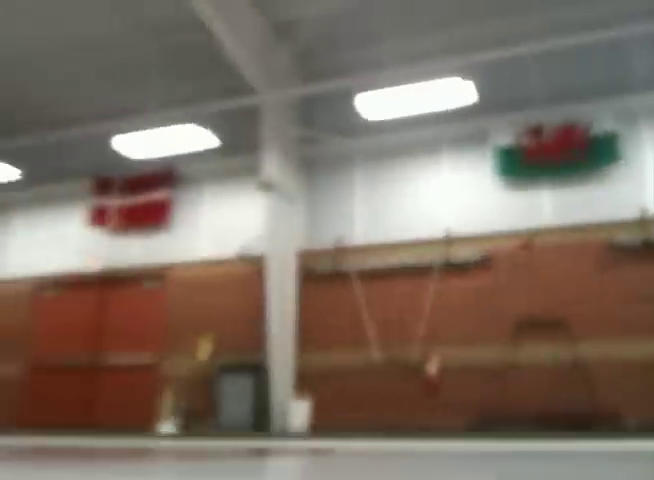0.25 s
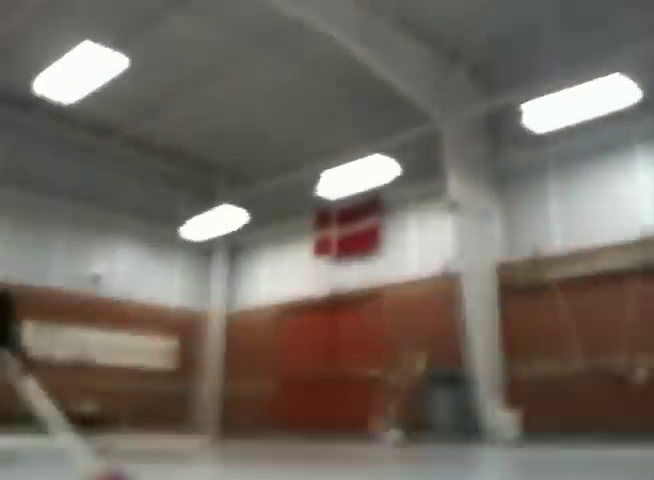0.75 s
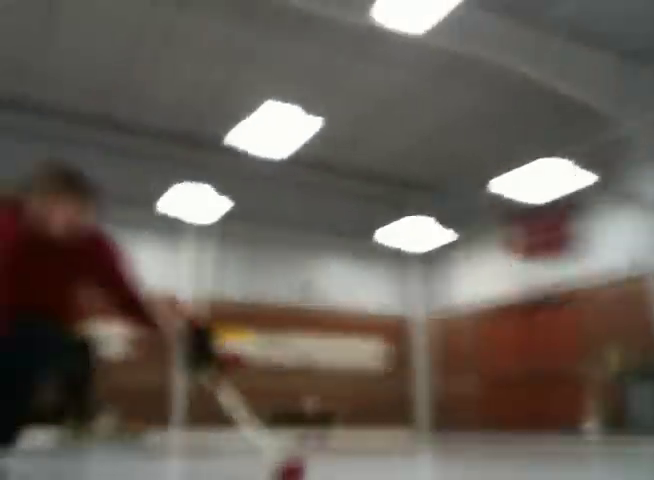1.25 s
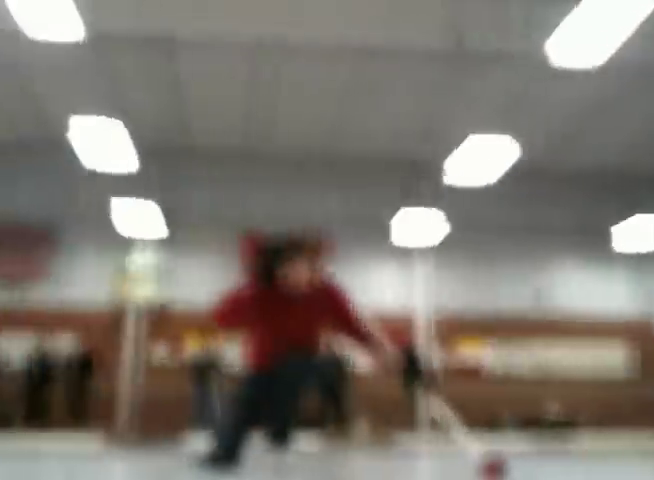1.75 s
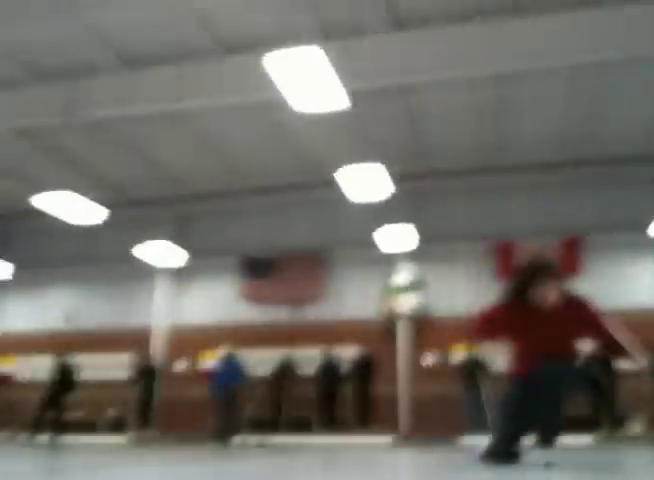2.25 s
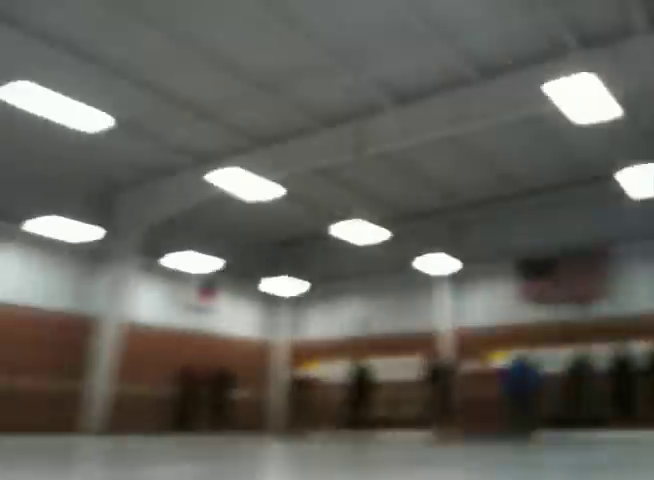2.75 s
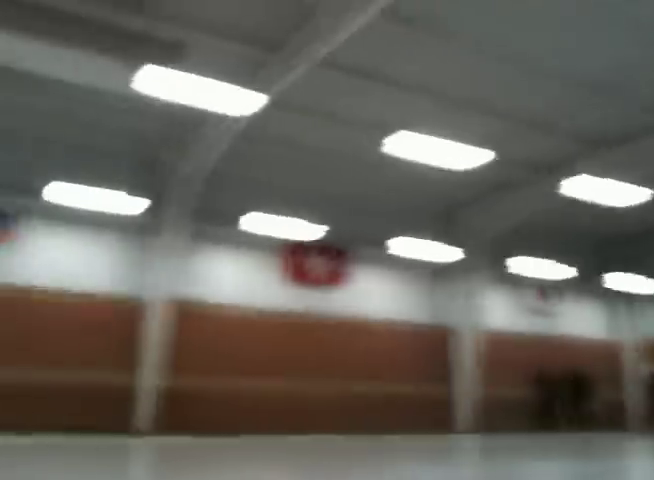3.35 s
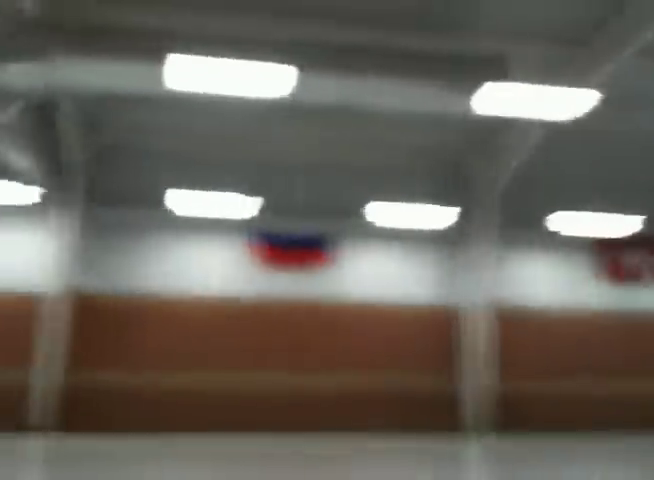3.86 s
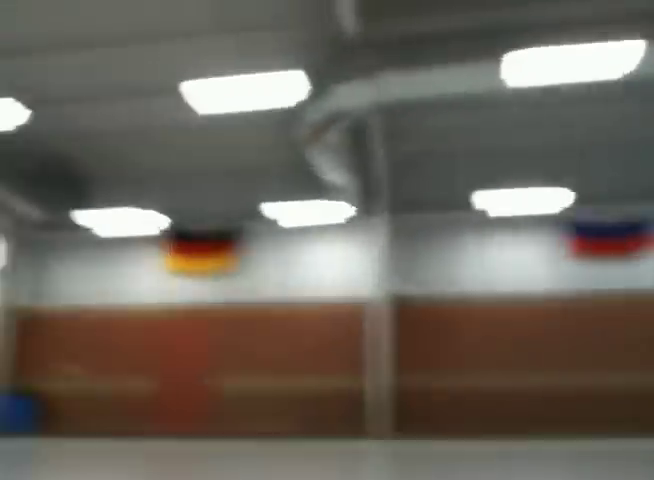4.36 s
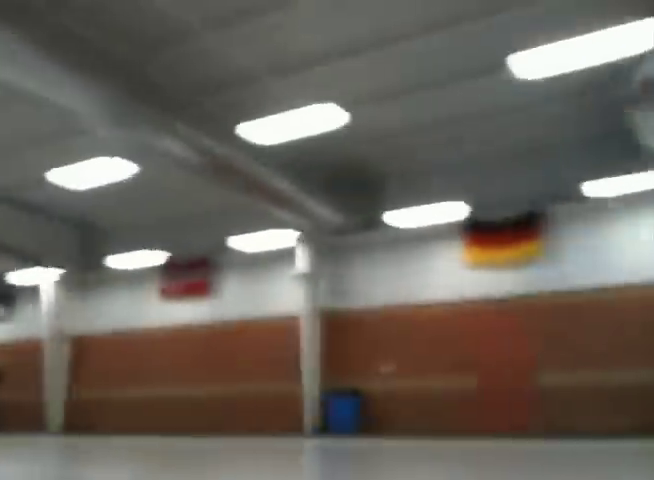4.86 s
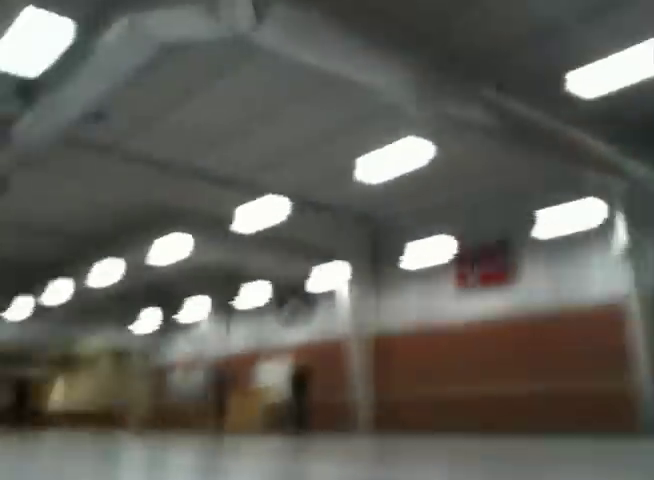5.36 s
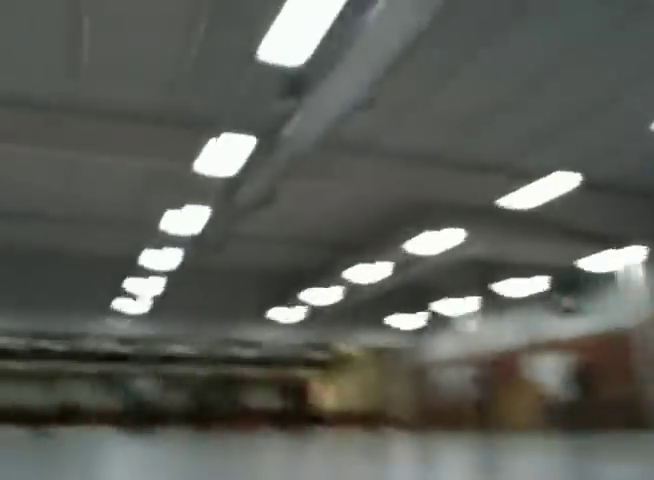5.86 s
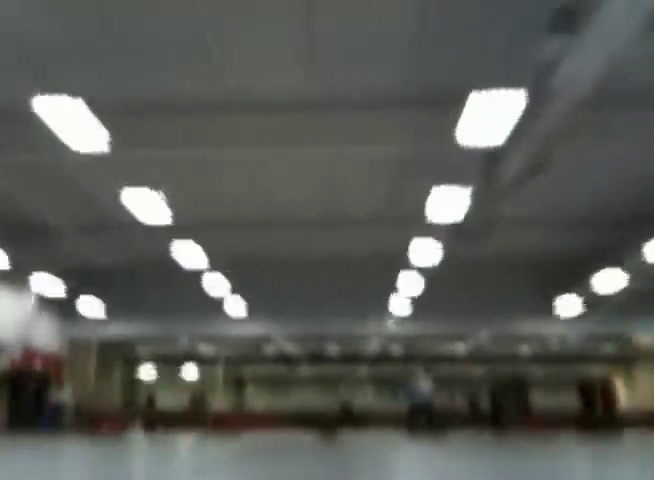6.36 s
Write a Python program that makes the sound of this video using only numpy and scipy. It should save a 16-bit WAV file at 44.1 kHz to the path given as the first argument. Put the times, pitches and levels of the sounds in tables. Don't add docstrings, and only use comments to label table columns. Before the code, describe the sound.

Continuous rattling ride on a sliding curling stone. Ice pebbles thump the stone and its mount hums low; the loose case answers with sharp clacks, many per second, and a lighter part ticks brightly. The opening is hissier, the middle knocks hardest, then the rattle thins a little before busy knocks return. The microphone is sealed in the case, hearing through solid contact, with only dull hall rumble behind.

```python
import sys
import numpy as np
from scipy import signal
from scipy.io import wavfile
from scipy.ndimage import uniform_filter1d

SR = 44100
rng = np.random.default_rng(int(sys.argv[2]) if len(sys.argv) > 2 else 0)


def put_to_file(sound):
    columns = np.atleast_2d(sound).T
    safe = np.clip(columns, -1, 1)
    whole_steps = np.round(safe * 32767)
    wavfile.write(sys.argv[1], SR, whole_steps.astype(np.int16))


def field_ratio(decibels):
    return 10 ** (np.asarray(decibels, dtype=float) / 20)


N = 291942


def level(x):
    return x / np.sqrt(np.mean(x ** 2))


def ring(x, hz, width_hz):
    return signal.lfilter(*signal.iirpeak(hz, hz / width_hz, fs=SR), x)


def body(x, modes):
    out = np.zeros(N)
    for k, (hz, width_hz, db) in enumerate(modes):
        out += (-1) ** k * field_ratio(db) * ring(x, hz, width_hz)
    return out


def place(s, shapes):
    out = np.zeros(N + SR)
    starts = (np.abs(s) * SR).astype(int)
    np.add.at(out, starts[:, None] + np.arange(shapes.shape[1]), shapes)
    return out


def wander(rate_hz):
    hold = int(SR / rate_hz)
    steps = np.repeat(rng.standard_normal(N // hold + 1), hold)
    return uniform_filter1d(steps, hold)[:N]


def patches(rate_hz, depth_db):
    return field_ratio(depth_db * np.maximum(wander(rate_hz), -1))


def swarm(count, spread_db, cap_db, even=False):
    chance = rng.random((count, 2))
    share = chance[:, 0]
    if even:
        gaps = 1 + share ** 2
        share = np.cumsum(gaps) / (gaps.sum() + 1)
    return share * N / SR, np.minimum(-spread_db * np.log(chance[:, 1]), cap_db)


def controls(table):
    s, *columns = np.transpose(table)
    return [np.interp(np.arange(N) / SR, s, c) for c in columns]


def rink():
    rumble = level(ring(rng.standard_normal(N), 188, 78))
    floor = level(ring(rng.standard_normal(N), 40, 31))
    return field_ratio(-33) * rumble + field_ratio(-34.5) * floor


def chatter(s, db, contact_ms, rebound_ms, rebound_db, rattle_db):
    t_ms = np.arange(300) / SR * 1000
    chance = rng.standard_normal((len(s), 2))
    late_ms = rebound_ms * (1 + .1 * chance[:, :1])
    first = np.exp(-t_ms / contact_ms)
    again = field_ratio(rebound_db + 4 * chance[:, 1:]) * np.exp(-np.abs(t_ms - late_ms) / .15)
    rattle = field_ratio(rattle_db) * np.exp(-np.maximum(t_ms - late_ms, 0) / 1.9)
    grit = rng.standard_normal((len(s), len(t_ms)))
    grit[:, 0] = -3.5
    grit /= np.sqrt(np.sum((grit * first) ** 2, axis=1, keepdims=True))
    return place(s, field_ratio(db)[:, None] * grit * (first + again + rattle))[:N]


def lull_after(s, db, after_ms, last_ms, depth_db):
    t_ms = np.arange(900) / SR * 1000
    lull = np.exp(-((t_ms - after_ms) / last_ms) ** 4)
    hushed = place(s, field_ratio(db + 12)[:, None] * lull)[:N]
    return field_ratio(depth_db * np.tanh(hushed))


# start_s, level_db (peak)
KNOCKS = [(0.0054, -29), (0.0247, -15), (0.0417, -17), (0.0557, -29), (0.0867, -25), (0.0989, -21),
          (0.1303, -22), (0.1626, -31), (0.2184, -19), (0.2359, -19.5), (0.2521, -18), (0.2666, -17),
          (0.284, -19), (0.297, -22), (0.33, -29), (0.3632, -26.5), (0.4086, -30), (0.4438, -18),
          (0.4641, -15.0), (0.4818, -23), (0.497, -21), (0.5124, -17), (0.5388, -21), (0.5703, -18),
          (0.6113, -22), (0.6201, -19.5), (0.649, -19.5), (0.6874, -26.5), (0.7225, -20), (0.7346, -21),
          (0.8083, -14.5), (0.825, -23), (0.8684, -18), (0.8843, -20.5), (0.915, -21), (0.9485, -24),
          (0.9698, -29), (0.9808, -21), (0.9957, -22), (1.0148, -20), (1.0253, -20), (1.037, -21),
          (1.0525, -19), (1.069, -16.5), (1.1094, -33), (1.1576, -23), (1.2146, -25), (1.235, -20),
          (1.2464, -14), (1.267, -12), (1.285, -22), (1.3365, -20), (1.3734, -20), (1.4121, -17),
          (1.4638, -14.5), (1.4853, -27), (1.4945, -25.5), (1.533, -17), (1.5918, -9.5), (1.6185, -17.5),
          (1.6505, -8.5), (1.669, -15), (1.691, -21), (1.7017, -18.5), (1.716, -18), (1.731, -16.5),
            (1.7502, -19), (1.769, -18), (1.8065, -29), (1.869, -15.5), (1.886, -21), (1.906, -23.0),
            (1.922, -14.5), (1.942, -11.5), (1.9555, -16), (1.9742, -23), (2.0442, -25), (2.1617, -11.5),
            (2.185, -16), (2.242, -27), (2.259, -26), (2.301, -23), (2.326, -18.5), (2.3527, -22),
            (2.3676, -15.5), (2.4089, -25), (2.4274, -19), (2.4382, -16.5), (2.5324, -19), (2.5464, -18.5),
            (2.584, -19.5), (2.6544, -26), (2.6684, -22.5), (2.702, -19), (2.724, -17), (2.743, -15.5),
            (2.8028, -23.5), (2.817, -15.5), (2.8378, -18), (2.8535, -23), (2.8733, -24), (2.8871, -17.5),
            (2.958, -21.5), (3.073, -23), (3.0939, -17.5), (3.1123, -20), (3.1242, -20), (3.1422, -21),
            (3.156, -19), (3.19, -19), (3.2048, -14), (3.281, -22.5), (3.294, -14.5), (3.306, -25),
            (3.3356, -20), (3.3759, -20), (3.4523, -32), (3.47, -23),
          (3.4845, -13.5), (3.5085, -16.5), (3.523, -20.5), (3.5307, -25.0), (3.5394, -22),
            (3.5602, -17.5), (3.5768, -14), (3.5868, -20), (3.6505, -19), (3.672, -19.5), (3.687, -23),
            (3.7005, -16.5), (3.731, -19), (3.7444, -15.5), (3.765, -16), (3.784, -14), (3.8022, -13),
            (3.8302, -18), (3.8483, -11), (3.8692, -13), (3.9156, -17), (3.9275, -20), (3.946, -13.5),
            (3.9697, -16), (3.9859, -17), (4.0051, -9.5), (4.0599, -13.5), (4.0774, -11), (4.1015, -26),
            (4.1094, -20), (4.1212, -23), (4.149, -18), (4.163, -15), (4.2063, -22), (4.2182, -21),
            (4.2384, -24.0), (4.2979, -24), (4.3113, -24), (4.323, -24), (4.3404, -24), (4.3648, -17.5),
            (4.3837, -22.5), (4.4598, -18), (4.4993, -24), (4.5141, -27), (4.524, -19), (4.534, -21),
            (4.5456, -21), (4.574, -17.5), (4.594, -13), (4.6092, -20), (4.73, -26), (4.7474, -19),
            (4.779, -16), (4.7972, -24), (4.823, -25), (4.8348, -26), (4.873, -34), (4.914, -20.5),
            (4.9296, -23),
          (4.942, -25), (4.969, -17), (4.9865, -18.5), (5.0002, -24.5), (5.047, -24), (5.065, -24),
            (5.0785, -20.5), (5.1047, -20), (5.1187, -22), (5.1327, -16.5), (5.1449, -25), (5.157, -21),
            (5.2003, -21.5), (5.2172, -16), (5.231, -19.5), (5.3245, -22.5), (5.3359, -18), (5.35, -17),
            (5.4177, -21.5), (5.4397, -23), (5.4622, -15), (5.4772, -13.5), (5.495, -16), (5.545, -20.5),
            (5.5694, -28), (5.5996, -19), (5.614, -15), (5.653, -22), (5.6773, -29), (5.814, -28),
            (5.824, -23), (5.8343, -19.5), (5.854, -19.5), (5.9278, -17), (5.9462, -19.0), (5.961, -15.5),
            (6.0628, -21.5), (6.1055, -28), (6.1645, -20), (6.19, -20), (6.2458, -21), (6.2784, -19.5),
            (6.292, -18), (6.3298, -14.5), (6.3503, -20), (6.3665, -17.5), (6.39, -23), (6.4012, -14.5),
            (6.4185, -17.5), (6.43, -19), (6.4706, -13), (6.519, -27), (6.5335, -19), (6.5444, -23),
            (6.5573, -17.5), (6.5782, -20), (6.5931, -12), (6.6118, -15),
          (4.96, -27),
    (5.0286, -28),
    (5.758, -32),
    (5.8002, -35),
    (5.8855, -30),
    (5.8975, -30),
    (6.0325, -25),
    (6.0855, -24),
]


def knocking(loose_db):
    bounce_ms, scatter, clear_ms = 17, 0.19, 13
    s, db = np.transpose(KNOCKS)
    chance = rng.standard_normal((500, 2))
    gaps_s = bounce_ms / 1000 * np.exp(scatter * chance[:, 0])
    rock_s = np.minimum(np.cumsum(gaps_s), N / SR)
    nearest_s = np.abs(rock_s[:, None] - s).min(axis=1)
    free = (nearest_s > clear_ms / 1000) & (rock_s < N / SR)
    loose_then_db = loose_db[np.clip(rock_s * SR, 0, N - 1).astype(int)]
    rock_db = loose_then_db + 29 + 1.4 * chance[:, 1] - 100 * ~free
    return np.r_[s, rock_s], np.r_[db + 15.5, rock_db]


# pitch_hz, width_hz, level_db
CASE = [
    (813.3, 10.4, 5),
    (1195, 60, -4),
    (1624, 250, -9),
    (1765, 39, -3.5),
    (1974, 34, -11),
    (2532, 132, -11.5),
    (2977, 28, -17),
    (2800, 910, -22),
    (3240, 96, -16.5),
]
# pitch_hz, width_hz, level_db
KNOCK_RING = [
    (3880, 460, -6.5),
    (4670, 1800, -15.5),
    (5350, 760, -6),
    (6357, 890, 6),
    (8060, 240, -7),
    (10560, 330, -3),
]


def shell(hits, fine, clear, hiss):
    buzz = swarm(count=600, spread_db=0, cap_db=6.5, even=True)
    buzz = level(chatter(*buzz, contact_ms=0.13, rebound_ms=1.6, rebound_db=-24, rattle_db=-31))
    knocks = field_ratio(1.5) * chatter(*hits, contact_ms=0.13, rebound_ms=2.4, rebound_db=-7, rattle_db=-16.5)
    knocks += field_ratio(6.5) * fine * clear * buzz + hiss
    low = signal.butter(4, 2100, fs=SR, output="sos")
    hum = field_ratio(-37) * signal.sosfilt(low, rng.standard_normal(N))
    panels = np.zeros(N)
    for hz, width_hz, db in CASE:
        spot = np.tanh(1.3 + 1.59 * wander(150))
        panels += field_ratio(db) * ring(knocks * spot + hum, hz, width_hz)
    dull = signal.lfilter(*signal.butter(1, [2200, 9000], "band", fs=SR), knocks)
    return body(dull, KNOCK_RING) + field_ratio(11.5) * panels


# start_s, level_db (peak)
TICKS = [(0.0077, -26), (0.013, -20), (0.0316, -25), (0.1372, -24), (0.1921, -27), (0.3894, -24),
         (0.5526, -22), (0.5972, -18.5), (0.6597, -23), (0.7957, -23), (0.8586, -21), (0.9504, -23.5),
         (0.956, -24), (1.0044, -18.5), (1.083, -22), (1.0976, -31), (1.2052, -21), (1.221, -19),
         (1.2592, -13), (1.3479, -19), (1.481, -26), (1.5557, -15), (1.6116, -19), (1.634, -19),
         (1.6376, -18), (1.6438, -25), (1.6791, -23), (1.713, -20), (1.7828, -25), (1.8773, -27),
         (1.8879, -23), (1.895, -21), (1.906, -21), (1.9509, -19), (2.0308, -25), (2.1408, -19),
         (2.147, -21), (2.189, -20), (2.2615, -21.5), (2.3847, -24), (2.4104, -21), (2.464, -22),
         (2.4751, -23), (2.6693, -20), (2.7042, -22.0), (2.9045, -19), (2.9559, -23), (3.0325, -22),
         (3.1142, -27), (3.1693, -16), (3.222, -19), (3.2538, -23.0), (3.276, -19), (3.2813, -22),
         (3.3018, -21),
         (3.307, -22.5), (3.437, -28), (3.4414, -23.5), (3.4543, -19.5), (3.472, -19), (3.4988, -22),
           (3.6066, -24.0), (3.6195, -20.5), (3.6748, -22), (3.6897, -22), (3.7323, -23.5), (3.7518, -26),
           (3.761, -17.5), (3.9345, -23), (4.0473, -23), (4.0892, -23), (4.0949, -28), (4.1089, -19),
           (4.1174, -20), (4.17, -23.5), (4.2057, -23), (4.2118, -22), (4.2493, -22), (4.2664, -27),
           (4.273, -28), (4.305, -19), (4.311, -18), (4.3204, -25.0), (4.3352, -21.5), (4.341, -20),
           (4.3577, -26), (4.382, -15.5), (4.4673, -20), (4.5543, -20), (4.705, -17), (4.7383, -23),
           (4.821, -17), (4.849, -27), (5.0437, -24), (5.049, -18), (5.0556, -24.5), (5.1466, -17),
           (5.3379, -22.5), (5.401, -20), (5.445, -21), (5.4637, -23), (5.508, -19.5), (5.7228, -23),
           (6.208, -18), (6.2585, -23), (6.306, -21.0), (6.349, -16), (6.488, -17), (6.535, -18),
           (6.546, -17.5), (6.571, -18), (6.6008, -26.5)]


def ticking(knock_s, knock_db):
    follow_ms, follow_db = np.array([1.5, 8]), np.array([-13, -16.5])
    s, db = np.transpose(TICKS)
    chance = rng.standard_normal((len(knock_s), 4))
    late_s = knock_s[:, None] + follow_ms / 1000 * (1 + .12 * chance[:, :2])
    late_db = knock_db[:, None] + follow_db + 3 * chance[:, 2:]
    return np.r_[s, late_s.ravel()], np.r_[db + 12, late_db.ravel()]


# pitch_hz, width_hz, level_db
TICK_RING = [
    (7560, 1080, 2.5),
    (9800, 1050, -2.5),
    (11560, 1400, -9.5),
    (16000, 420, -29),
]


def lighter_part(hits, fine, clear, scrape):
    buzz = swarm(count=1200, spread_db=0, cap_db=-1, even=True)
    buzz = level(chatter(*buzz, contact_ms=0.78, rebound_ms=1, rebound_db=-4, rattle_db=-25))
    ticks = field_ratio(6.5) * chatter(*ticking(*hits), contact_ms=0.2, rebound_ms=0.82, rebound_db=-7, rattle_db=-28)
    ticks += field_ratio(7) * fine * clear ** 0.027 * buzz
    ticks += field_ratio(-8.5) * fine * scrape
    return body(ticks, TICK_RING)


def case(loose_db):
    hits = knocking(loose_db)
    clear = lull_after(*hits, after_ms=9, last_ms=5, depth_db=-15)
    fine = field_ratio(loose_db + 1.5) * patches(60, 5.23)
    scrape = patches(130, 6.9) * rng.standard_normal((2, N))
    launch_db = 19 * np.exp(-np.arange(N) / SR / 0.95)
    hiss = field_ratio(loose_db - 7 + launch_db) * np.sqrt(clear) * scrape[0]
    return shell(hits, fine, clear, hiss) + lighter_part(hits, fine, clear, scrape[1])


def jolts(s, db, width_ms, scatter):
    width = width_ms * np.exp(scatter * rng.standard_normal((len(s), 1)))
    t = (np.arange(256) - 128) / SR * 1000 / width
    dip = 0.21 * np.exp(-(t + 2.22) ** 2)
    return place(s, field_ratio(db)[:, None] * (np.exp(-t ** 2 / 2) - dip))[128:N + 128]


# start_s, level_db (peak)
BUMPS = [(0.0221, -10), (0.037, -18), (0.048, -13), (0.059, -9.5), (0.071, -7), (0.0858, -15),
         (0.113, -14.5), (0.123, -12), (0.1659, -12), (0.2183, -12), (0.2253, -19), (0.236, -15),
         (0.2592, -13), (0.2667, -8.5), (0.276, -15), (0.3059, -11), (0.471, -12.5), (0.4936, -10.5),
         (0.5026, -12), (0.511, -11), (0.5181, -7), (0.5298, -13), (0.563, -12), (0.5739, -17),
         (0.5816, -13.0), (0.6188, -13), (0.6337, -13), (0.6873, -27), (0.702, -18), (0.7412, -18),
         (0.769, -16), (0.7812, -13), (0.7916, -16), (0.804, -14.0), (0.8145, -17), (0.8606, -13),
         (0.888, -11), (0.9141, -11.5), (0.9341, -15), (0.9718, -16), (0.9795, -12), (0.9895, -10),
         (1.0006, -12), (1.0114, -14), (1.0225, -7), (1.0877, -12), (1.1773, -15), (1.203, -16),
         (1.2179, -11.5), (1.247, -18), (1.257, -8.5), (1.2826, -12.5), (1.2938, -10.5), (1.3004, -15),
         (1.337, -19), (1.3789, -5), (1.4382, -15), (1.4462, -8), (1.4536, -9), (1.464, -13),
         (1.4805, -16), (1.5555, -12), (1.5694, -11), (1.5914, -6.5), (1.599, -11), (1.618, -8),
           (1.6491, -10), (1.6579, -4), (1.673, -9.5), (1.6909, -11), (1.7338, -14), (1.7503, -10),
           (1.7964, -15.0), (1.8928, -8), (1.915, -4), (1.9207, -16), (1.9326, -15), (1.951, -16),
           (1.9687, -17), (2.0001, -10.5), (2.0487, -15), (2.066, -15), (2.183, -15), (2.19, -9.5),
           (2.198, -14), (2.2589, -11), (2.2782, -13), (2.3248, -17), (2.3711, -7.5), (2.4256, -16),
           (2.4379, -24), (2.4506, -7.5), (2.4575, -13), (2.508, -16), (2.5235, -15), (2.5408, -12),
           (2.555, -7), (2.5623, -10), (2.6732, -11.5), (2.6857, -20), (2.717, -15), (2.736, -9),
           (2.7772, -17), (2.7883, -15), (2.8152, -10), (2.83, -4.5), (2.841, -8), (2.851, -18),
           (2.8615, -11), (2.932, -20), (2.94, -17), (2.9486, -14), (2.9583, -15), (2.978, -10),
           (3.0111, -12.5), (3.0417, -10), (3.053, -10), (3.0664, -8.5), (3.077, -6.5), (3.0931, -13),
         (3.1034, -9.5), (3.1197, -12), (3.1497, -18), (3.198, -14), (3.204, -6), (3.2263, -14.5),
           (3.272, -5), (3.2895, -9), (3.3214, -17), (3.3333, -19), (3.3498, -9), (3.362, -5.5),
           (3.372, -18), (3.3922, -15), (3.4157, -10.5), (3.4364, -15), (3.4572, -14), (3.486, -28),
           (3.515, -13), (3.549, -18), (3.5698, -17), (3.5821, -18), (3.5971, -16), (3.6196, -13),
           (3.6344, -5.5), (3.646, -16), (3.6528, -13), (3.6595, -14), (3.6724, -13), (3.6896, -17),
           (3.7004, -9), (3.7134, -9), (3.7307, -16), (3.743, -13), (3.7741, -10), (3.781, -8),
           (3.7889, -17), (3.8, -10), (3.83, -14), (3.842, -12), (3.8483, -13), (3.86, -11.5), (3.867, -17),
           (3.8733, -14.5), (3.888, -3.5), (3.9143, -9), (3.931, -11), (3.9564, -12.5), (3.9925, -20),
           (4.0045, -11), (4.0147, -17), (4.059, -13), (4.078, -14.5), (4.0983, -12), (4.1047, -10),
           (4.122, -16), (4.1367, -14), (4.143, -5), (4.1946, -19), (4.202, -10.5),
         (4.2371, -11), (4.289, -21), (4.3054, -12), (4.3632, -19), (4.3771, -13), (4.393, -12),
           (4.42, -23), (4.433, -14), (4.467, -9), (4.478, -14), (4.4943, -14), (4.5116, -15), (4.5213, -5),
           (4.5403, -15), (4.556, -11), (4.5736, -9), (4.5902, -13), (4.6432, -9), (4.689, -16),
           (4.777, -13), (4.7954, -10), (4.8127, -11), (4.822, -17), (4.885, -15), (4.934, -8),
           (5.003, -21), (5.0748, -15), (5.0808, -11.5), (5.105, -22), (5.17, -16), (5.217, -15),
           (5.2613, -20), (5.3501, -8.5), (5.476, -14.5), (5.51, -11), (5.599, -12.5), (5.6735, -10),
           (5.7496, -13), (5.8529, -11.5), (5.863, -22), (5.8702, -11), (5.913, -15), (5.9265, -10.5),
           (6.1146, -20), (6.246, -10), (6.2567, -9), (6.2726, -15), (6.2837, -13), (6.3035, -14),
           (6.336, -19), (6.371, -20), (6.3781, -12), (6.388, -12), (6.42, -11), (6.4415, -8),
           (6.4536, -17), (6.471, -13.0), (6.5378, -10), (6.5507, -17), (6.558, -13)]
# pitch_hz, width_hz
MOUNT = [
    (221, 4),
    (277, 2),
]


def stone(rough_db, hum_db, lean_db):
    s, db = np.transpose(BUMPS)
    big = jolts(s, db + 3, width_ms=0.32, scatter=0.035)
    fine = jolts(*swarm(count=1900, spread_db=1, cap_db=-8), width_ms=0.42, scatter=0.22)
    push = big + field_ratio(rough_db + 2.5) * level(fine - fine.mean())
    push = push * np.minimum(np.arange(N) / 600, 1)
    give, q = 2 * np.pi * 168, 0.76
    spring = signal.bilinear([1, 0, 0], [1, give / q, give ** 2], SR)
    bumps = signal.lfilter(*spring, push)
    low, high = (level(ring(push, hz, width_hz)) for hz, width_hz in MOUNT)
    return bumps - field_ratio(hum_db + lean_db - 4) * low + field_ratio(hum_db - 5.5) * high


# start_s, rough_db (of the ice), loose_db (freedom of the case)
SLIDE = [(0, -23.5, -38), (.25, -25, -42), (.42, -27, -45.5), (.9, -24.5, -41), (1.3, -24.5, -42),
         (1.7, -23, -42.5), (1.82, -27, -41.5), (1.95, -26, -38), (2.08, -26, -45.5), (2.5, -26.5, -43),
         (3.0, -24.5, -43), (3.5, -24.5, -42.5), (3.95, -25, -43.5), (4.5, -24, -42.5), (4.75, -26, -44.5),
         (5.75, -28, -47), (6.1, -26, -42), (6.62, -26, -47.5)]
# start_s, hum_db, lean_db (towards the low ring)
SWAY = [(0.0, -25, -3), (0.03, -27.5, -19), (0.64, -24, -3), (1.1, -23, -11), (1.12, -31, 0),
        (2.36, -27.5, 3.5), (2.38, -22, -7), (2.58, -26.5, -4), (2.62, -31, 11), (2.73, -27.5, -1),
        (3.65, -39.5, 13.5), (3.89, -21, -6), (4.37, -36, 10), (4.55, -35, 5), (5.9, -30, 6.5),
        (6.01, -33, 13), (6.51, -22, -13), (6.62, -29, -17)]


def scene():
    rough_db, loose_db = controls(SLIDE)
    hum_db, lean_db = controls(SWAY)
    return (rink() + case(loose_db) + stone(rough_db, hum_db, lean_db))[None]


# low_hz, high_hz, time_share (0-1)
MUTED = [
    (2700, 4000, .15),
    (3700, 5600, .18),
    (8500, 15900, .08),
    (10500, 15900, .14),
    (12600, 15900, .25),
    (12700, 13300, .42),
    (13300, 13900, .55),
    (13900, 14700, .48),
    (14700, 15900, .35),
    (15800, 19000, .97),
]


def drop_faint_bands(sound):
    for low_hz, high_hz, share in MUTED:
        sos = signal.butter(8, [low_hz, high_hz], "band", fs=SR, output="sos")
        band = signal.sosfiltfilt(sos, sound)
        now_db, around_db = (10 * np.log10(uniform_filter1d(band ** 2, size=size) + 1e-12)
                             for size in (200, 1500))
        band_db = now_db - .85 * around_db
        band_db = band_db + 4 * (low_hz > 12600) * wander(35)
        mute = np.clip((np.quantile(band_db, share) - band_db) / 2 + .5, 0, 1)
        sound = sound - uniform_filter1d(mute, size=100) * band
    return sound


def roll_off(x):
    return signal.sosfilt(signal.butter(12, 16660, fs=SR, output="sos"), x)


def record(dry):
    dry = np.tanh(1.7 * dry) / 1.7
    bass_cut = signal.butter(3, 140, "high", fs=SR, output="sos")
    cut = signal.sosfiltfilt(bass_cut, dry) + field_ratio(-24.5) * dry
    cut = drop_faint_bands(cut)
    top_cut = signal.ellip(8, .2, 16, 15750, fs=SR, output="sos")
    mix = signal.sosfilt(top_cut, cut)
    return roll_off(mix)


dry = scene()
out = record(dry)
put_to_file(out)
```